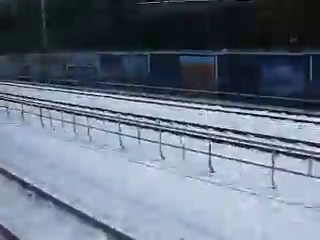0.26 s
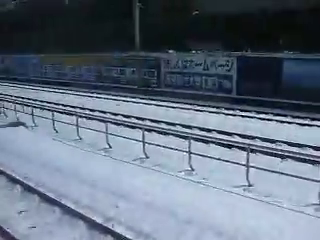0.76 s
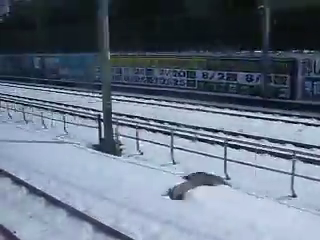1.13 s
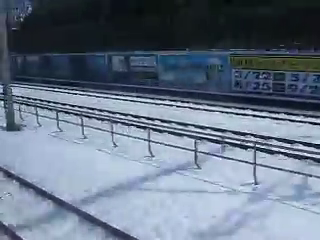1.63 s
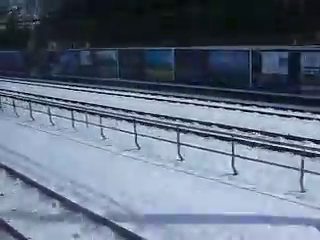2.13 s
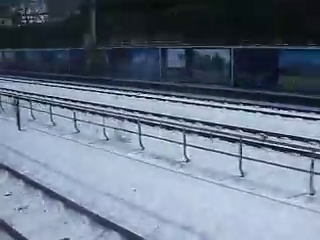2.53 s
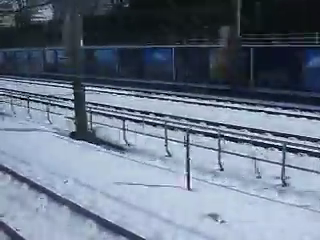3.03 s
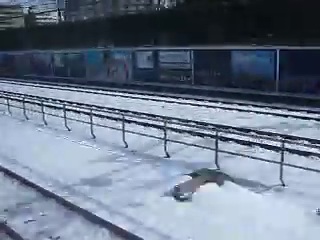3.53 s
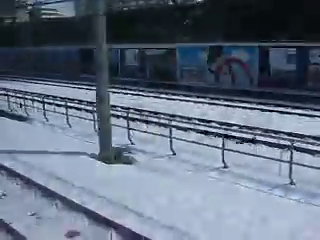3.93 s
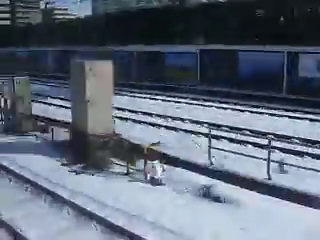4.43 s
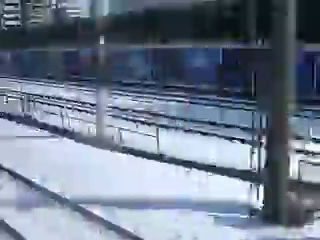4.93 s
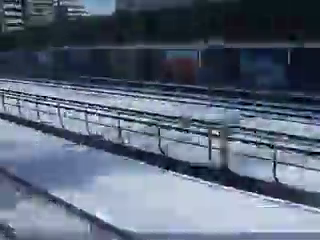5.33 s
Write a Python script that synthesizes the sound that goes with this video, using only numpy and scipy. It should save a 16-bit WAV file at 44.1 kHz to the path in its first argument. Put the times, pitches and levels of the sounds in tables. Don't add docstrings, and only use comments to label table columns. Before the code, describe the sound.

Heard from inside a moving electric train carriage: continuous low rumble and mid roar of wheels on rail, steady motor hum with several held tones, and faint smooth hiss at the glass. Soft, rounded floor thuds come irregularly, stronger after about three seconds. One close, narrow-band mono microphone, dull on top, slightly overloaded on the largest swings.

```python
import sys
import numpy as np
from scipy import signal
from scipy.io import wavfile
from scipy.ndimage import uniform_filter1d

SR = 44100
rng = np.random.default_rng(int(sys.argv[2]) if len(sys.argv) > 2 else 0)


def attenuation_scalar(level_db):
    decades = np.asarray(level_db, float) / 20
    return 10 ** decades


def pcm_store(signal):
    levels = np.round(np.clip(np.atleast_2d(signal), -1, 1) * 32767)
    wavfile.write(sys.argv[1], SR, levels.astype(np.int16).T)


N = 245195


def motor():
    # time_s, shaft_rate_hz
    shaft_speed = [(0, 53.14), (.7, 53.2), (1.4, 53.26), (2.8, 53.36), (4.2, 53.45), (5.56, 53.53)]
    loud_orders = (4, 7, 19, 23)
    loud_db = [-21, -17, -29.5, -29.5]
    loud_follow = [0.85, 1.4, .6, 0.33]
    faint_orders = (1, 5, 6, 8, 10, 11, 12, 14, 15, 16, 17, 22, 27, 37, 42)
    faint_db = [-34, -28, -32, -28.5, -36, -29.5, -35, -37, -37, -36, -36, -41, -44, -51, -49]

    turns = np.cumsum(follow(shaft_speed, column=1)) / SR
    hum = np.zeros(N)
    for order, db, share in zip(loud_orders, loud_db, loud_follow):
        phase = order * turns + rng.random() + 0.054 * wander(5.0)
        hum_db = db + share * load_db() + swells_db(order) + 0.74 * wander(12.0)
        hum += attenuation_scalar(hum_db) * np.cos(2 * np.pi * phase)
    for order, db in zip(faint_orders, faint_db):
        phase = order * turns + rng.random() + 0.09 * wander(4.4)
        hum_db = db + swells_db(order) + 2.08 * wander(4.0)
        hum += attenuation_scalar(hum_db) * np.cos(2 * np.pi * phase)
    return np.sqrt(2) * hum


def swells_db(order):
    # middle_s, shaft multiple, lift_db, half_length_s
    swells = [(3.28, 4, -2.5, 0.17), (3.66, 4, 3, 0.22), (4.45, 4, 2.5, 0.31), (5.38, 4, 3, .12),
              (.4, 11, -3, 0.27), (1.92, 11, -6.5, .14), (2.75, 11, -7.5, 0.36), (3.45, 11, -6, 0.18),
              (.2, 7, -5.5, 0.24), (.9, 7, -4, 0.32), (1.28, 7, 3.5, 0.091), (1.44, 7, -8.5, .08),
              (1.85, 7, 3, 0.16), (2.75, 7, 3, .25), (3.2, 7, 3.5, .09), (3.84, 7, 1.5, 0.071),
              (5.15, 7, -3.5, .25), (.25, 19, 4, .22), (1.28, 19, -13.5, .2), (2.1, 19, -11, 0.46),
              (3.52, 19, 5, 0.13), (4.32, 19, 6.5, .11), (4.64, 19, 4.5, .09), (5.28, 19, 3, 0.13),
              (1.12, 23, -6, .09), (1.62, 23, 4, .12), (2.7, 23, 6, 0.87), (4.0, 23, -3, 0.26),
              (4.48, 23, -10.5, .09), (5.54, 23, 3, 0.11)]
    return sum(lift * hump(s, half) for s, which, lift, half in swells if round(which) == order)


def wheels():
    # frequency_hz, density_db (per Hz)
    thud_shape = [(8, -24.5), (14, -2.5), (40, -7), (60, -0.5), (110, 0.5), (160, -5.5), (200, -6.5),
                  (300, -38.5)]
    boom_shape = [(150, -25.5), (200, -3.5), (240, -4.5), (340, -3.5), (400, -2), (440, -9), (550, -33)]
    roar_shape = [(350, -23.5), (430, 0), (490, -4), (560, -4), (700, -3), (820, -2), (1000, -3.5),
                  (1080, -6.5), (1300, -11), (1500, -24.5)]
    # time_s, bogie_db, floor_db
    surges = [(.11, 2, 1.3), (.5, .5, 2.5), (0.661, -2.1, -1), (.88, 0, -1.7), (1.06, 1.5, 3.5),
              (1.27, -2, 0), (1.56, -0.5, -3.5), (2.3, 1.7, 2), (2.8, 2, 1.5), (2.96, 4, 0.8),
              (3.1, -3.5, -1.1), (3.3, -4.5, 1.7), (3.62, 0, -2.5), (3.86, -3, -0.3), (4.02, 2.5, 2.5),
              (4.23, 1, -2.5), (4.62, 2.5, -0.5), (4.8, 0.5, 3.5), (5.05, 3, 3.5), (5.249, 3, 1.5),
              (5.4, 2.5, .3)]

    surge_s = 0.06
    bogie_db = sum(db * hump(s, surge_s) for s, db, _ in surges)
    floor_db = sum(db * hump(s, surge_s) for s, _, db in surges)
    load = load_db()
    thud = attenuation_scalar(-20 + 1.3 * load + bogie_db) * rushing(thud_shape, patchy_db=-0.15, ring=0.8)
    boom = attenuation_scalar(-17.5 + 0.66 * load + floor_db) * rushing(boom_shape, patchy_db=-0.2, ring=1.0)
    roar = attenuation_scalar(-18.5 + 0.65 * load) * rushing(roar_shape, patchy_db=1.72, ring=0.86)
    return thud + boom + roar


def load_db():
    # time_s, load_db
    wheel_load = [(0, -11.5), (.7, -11.5), (1.1, -11.5), (1.4, -11.5), (1.9, -11.5), (2.3, -11), (2.9, -10),
                  (3.35, -11), (3.95, -9), (4.65, -11), (5.1, -9), (5.56, -9)]
    usual_db = -11
    return follow(wheel_load, column=1) - usual_db


def jolts():
    # loudest_s, pitch_hz, rms_db, rise_s
    joints = [(.55, 61.1, -26, .06), (1.07, 62, -22.5, 0.056), (1.68, 207, -29, 0.056),
              (2.139, 627, -26, 0.047), (2.93, 70.2, -24, 0.088), (3.722, 62.7, -21.5, 0.066),
              (4.0, 276.3, -19.5, 0.11), (4.08, 108, -22.5, 0.067), (4.33, 253.3, -21, .08),
              (4.819, 322, -19, .07), (5.05, 85, -18, 0.13), (5.22, 306, -18.5, 0.18)]
    t = np.arange(N) / SR
    ringing = np.zeros(N)
    for (s, hz, db, rise), start in zip(joints, rng.random(len(joints))):
        u = np.maximum((t - s) / rise + 1, 0)
        swell = u * np.exp(1 - u)
        ringing += attenuation_scalar(db) * swell * np.sqrt(2) * np.cos(2 * np.pi * (hz * t + start))
    return ringing


def air():
    # frequency_hz, density_db (per Hz)
    hiss_shape = [(900, -27.5), (1300, -10.5), (1510, -2.5), (2000, -4), (2470, -4.5), (3110, -10.5),
                  (3700, -12.5), (4320, -14), (5160, -18.5), (5500, -19.5), (5600, -63.5)]
    return attenuation_scalar(-28 + 0.27 * wander(0.65)) * rushing(hiss_shape, patchy_db=0.9, ring=0)


def rushing(shape, patchy_db, ring):
    # pitch_hz, width_hz, lift_db
    panels = [(108, 13, -1), (257, 27, 2.5), (261, 26, 4.5), (306, 11, 6), (334, 28, 3.5), (483, 21, 5.5),
              (534, 18, 4.5), (635, 20, 7), (667, 23, -3.5), (789, 45, 4), (910, 27, 2.5), (1009, 20, 7)]
    hz = np.fft.rfftfreq(4096, 1 / SR)
    real, imag, patches = rng.standard_normal((N // 1024 + 5, 2049, 3)).T
    patches = uniform_filter1d(patches, size=5, axis=0)
    patches = evened(uniform_filter1d(patches, size=6, axis=1))
    modes_db = sum(db / (1 + (2 * (hz - f) / width) ** 2) for f, width, db in panels)
    colour_db = read(shape, hz) + ring * modes_db
    spectra = (real + 1j * imag) * attenuation_scalar(colour_db[:, None] + patchy_db * patches)
    return evened(signal.istft(spectra, nperseg=4096, noverlap=3072)[1][:N])


def read(points, hz):
    f, value = np.transpose(points)
    return np.interp(np.log(hz + 1), np.log(f + 1), value, left=-120, right=-120)


def follow(table, column):
    rows = np.array(table)
    return np.interp(np.arange(N) / SR, rows[:, 0], rows[:, column])


def hump(s, half):
    return np.exp(-((np.arange(N) / SR - s) / half) ** 2)


def wander(top_hz):
    t = np.arange(0, N + 256, 256) / SR
    rates_hz = top_hz * np.geomspace(0.08, 1, 12)
    slow = sum(np.sin(2 * np.pi * (f * t + rng.random())) / np.sqrt(f) for f in rates_hz)
    return np.interp(np.arange(N) / SR, t, evened(slow))


def evened(x):
    return x / np.sqrt(np.mean(x ** 2) + 1e-20)


def scene():
    return (motor() + wheels() + jolts() + air())[None]


def low_pass(x):
    return signal.sosfilt(signal.butter(12, 15850, fs=SR, output="sos"), x)


def record(dry):
    ceiling, offset, full_scale = 0.6915, -0.0115, 0.7048
    coarse = np.clip(dry[:, ::4], -ceiling, ceiling) + offset
    smooth = signal.firwin(127, 5500, window=("kaiser", 8.0), fs=SR)
    stretched = signal.resample_poly(coarse, up=4, down=1, axis=1, window=smooth, padtype="reflect")[:, :N]
    mirror = attenuation_scalar(-87) * np.cos(np.pi / 2 * np.arange(N))
    stretched = stretched * (1 + mirror)
    clipped = np.clip(stretched, -full_scale, full_scale)
    rounded = np.round(clipped * 2 ** 15) / 2 ** 15
    return low_pass(rounded)


dry = scene()
out = record(dry)
pcm_store(out)
```